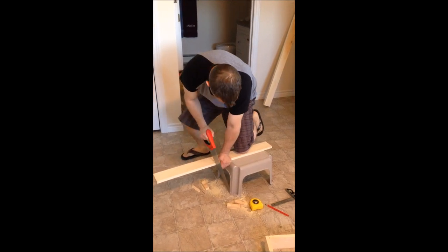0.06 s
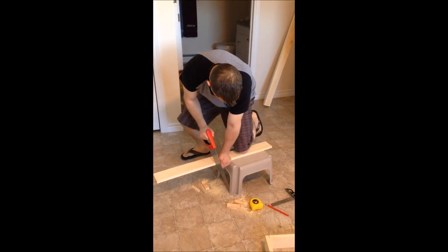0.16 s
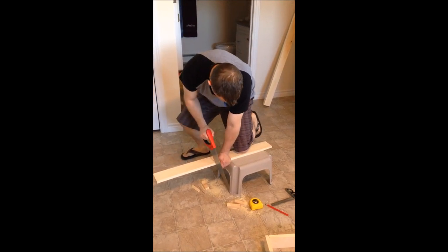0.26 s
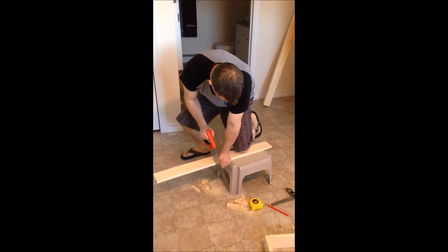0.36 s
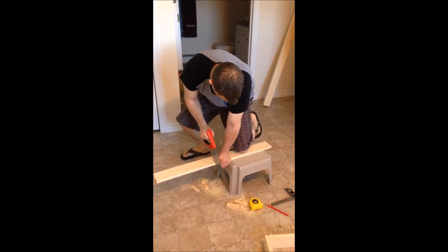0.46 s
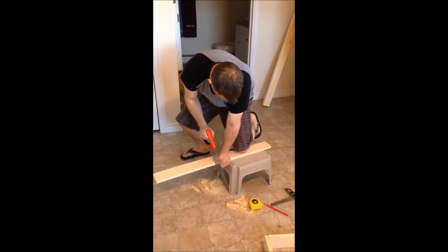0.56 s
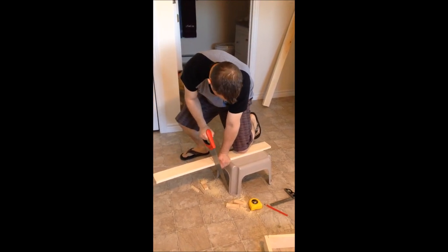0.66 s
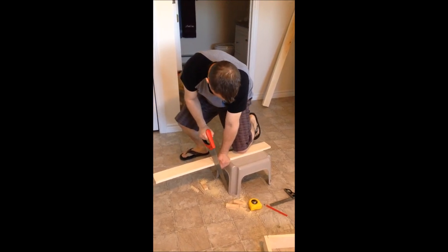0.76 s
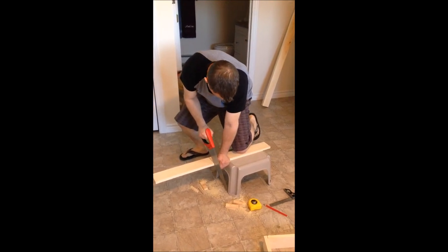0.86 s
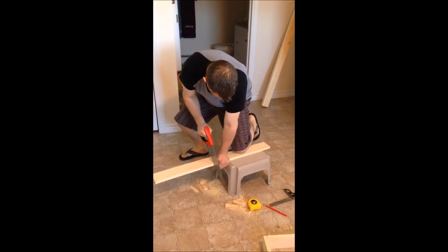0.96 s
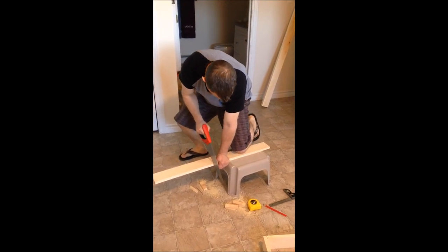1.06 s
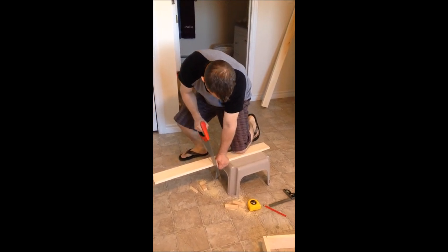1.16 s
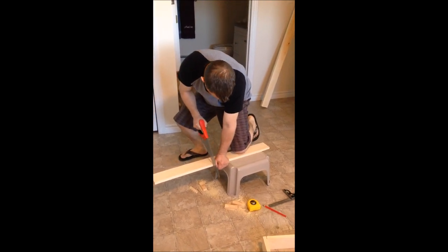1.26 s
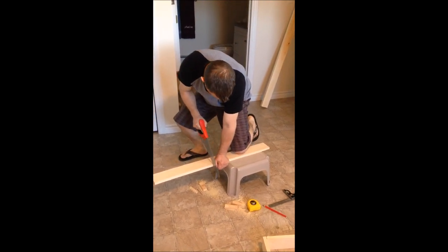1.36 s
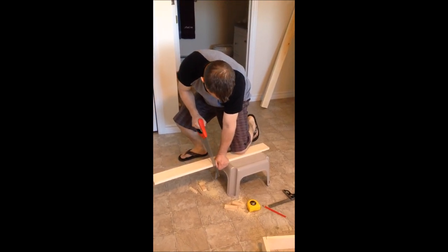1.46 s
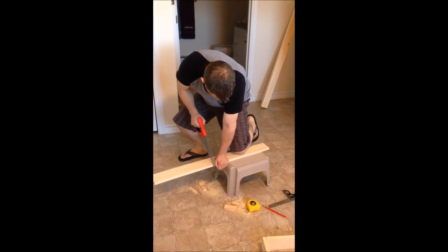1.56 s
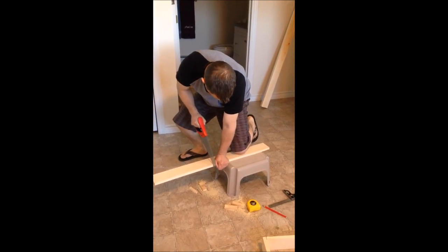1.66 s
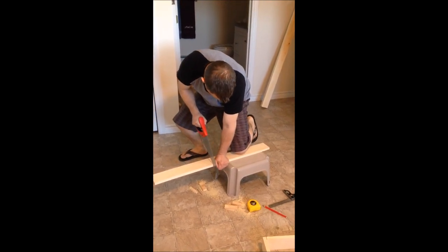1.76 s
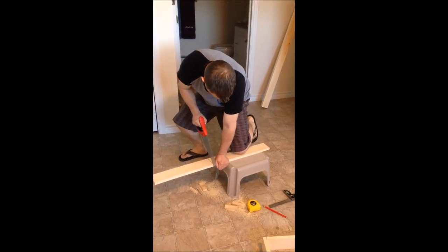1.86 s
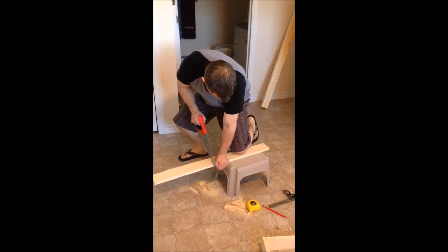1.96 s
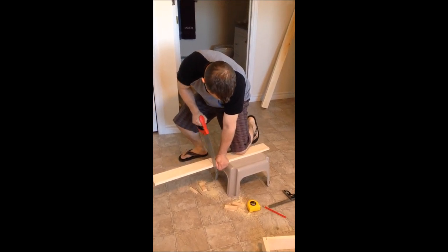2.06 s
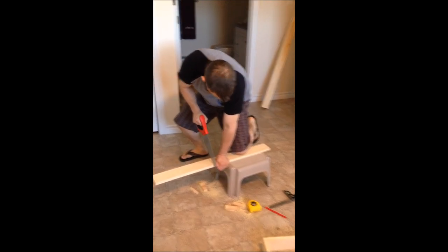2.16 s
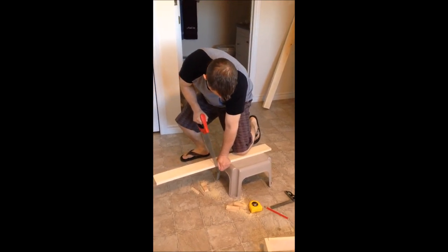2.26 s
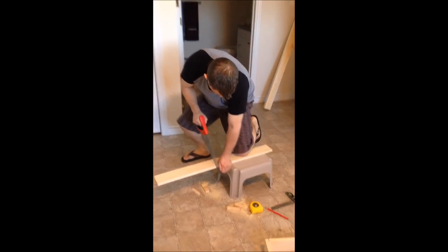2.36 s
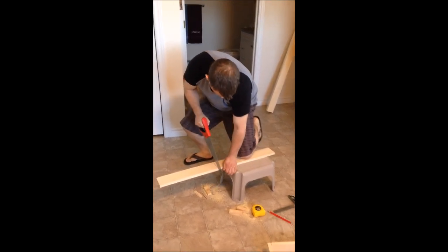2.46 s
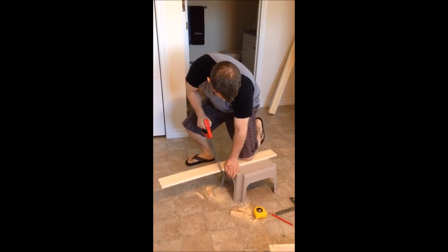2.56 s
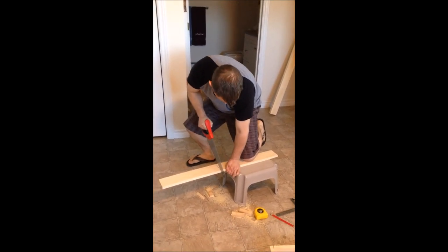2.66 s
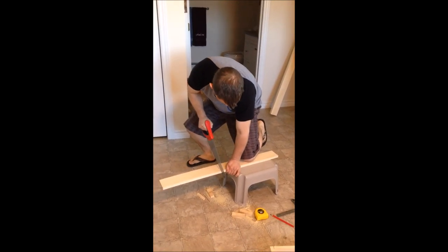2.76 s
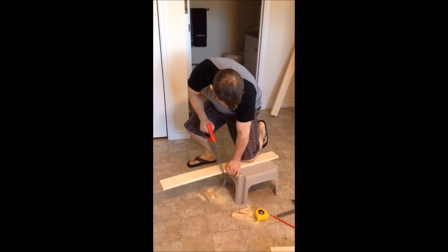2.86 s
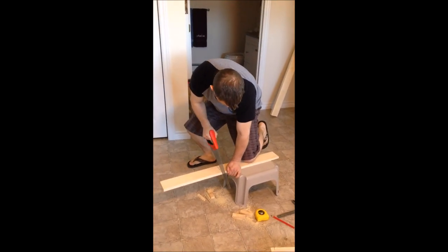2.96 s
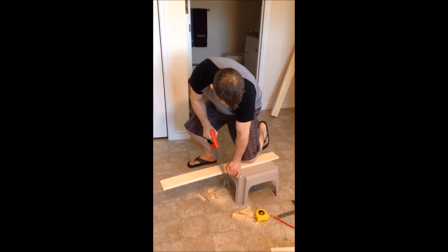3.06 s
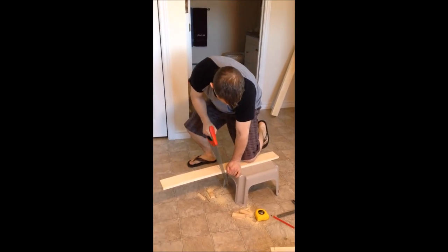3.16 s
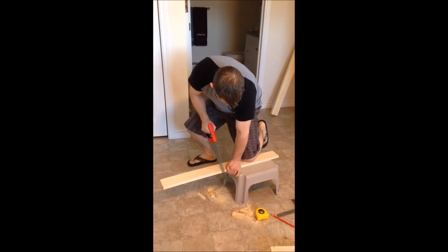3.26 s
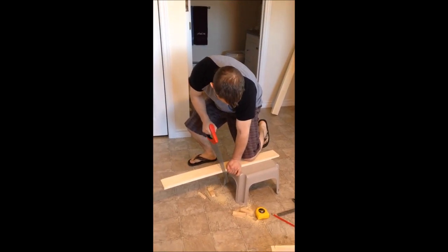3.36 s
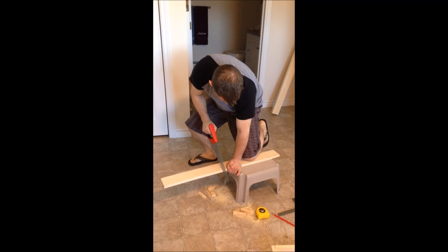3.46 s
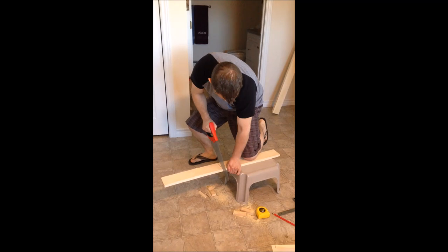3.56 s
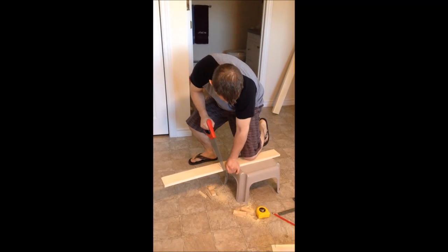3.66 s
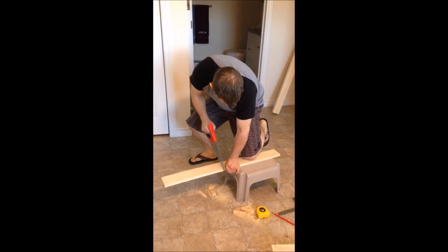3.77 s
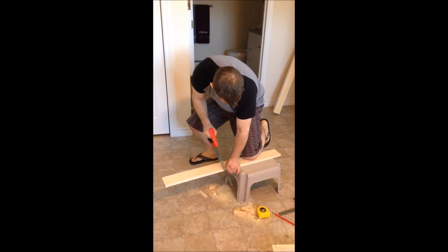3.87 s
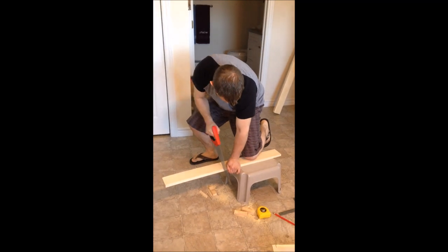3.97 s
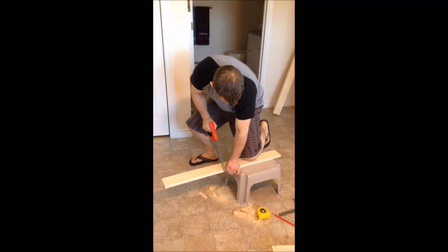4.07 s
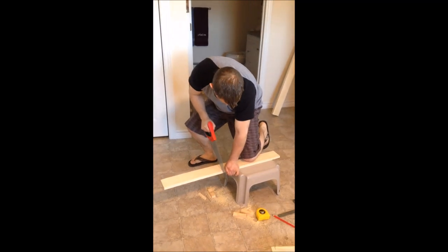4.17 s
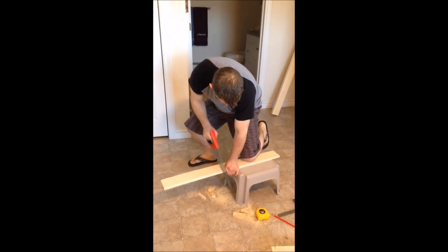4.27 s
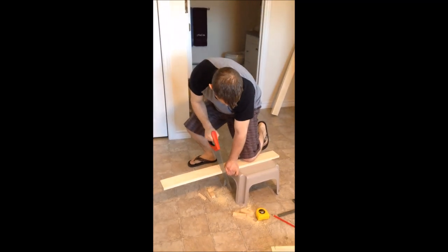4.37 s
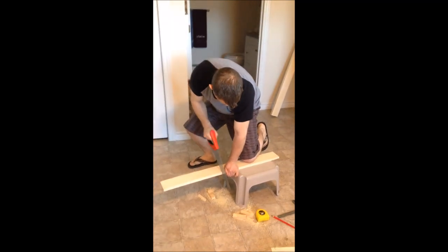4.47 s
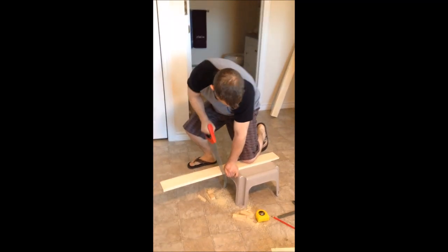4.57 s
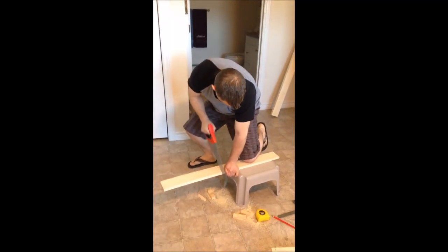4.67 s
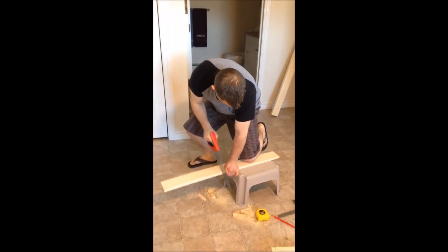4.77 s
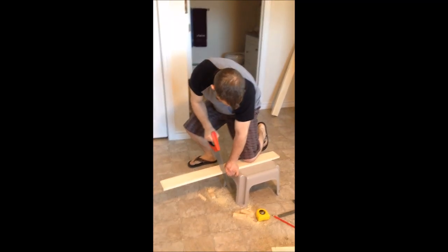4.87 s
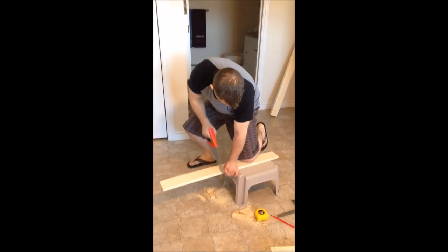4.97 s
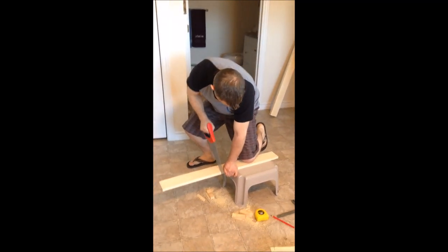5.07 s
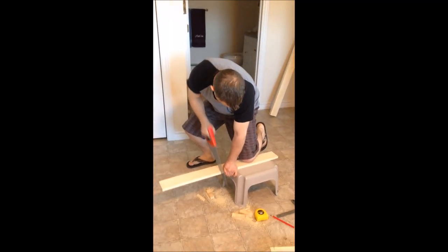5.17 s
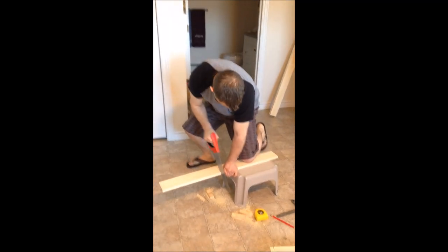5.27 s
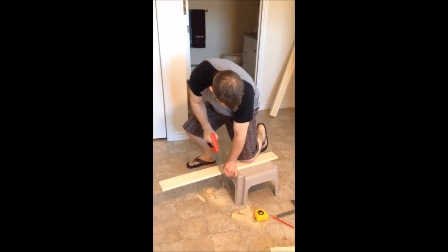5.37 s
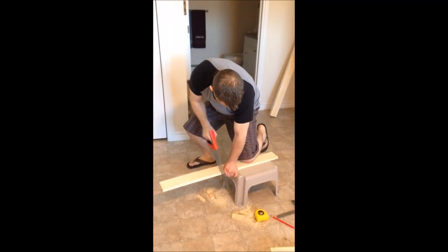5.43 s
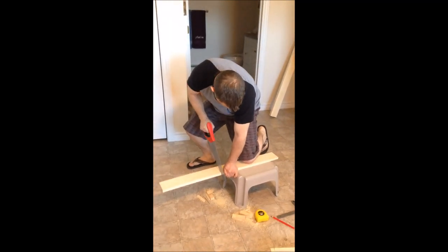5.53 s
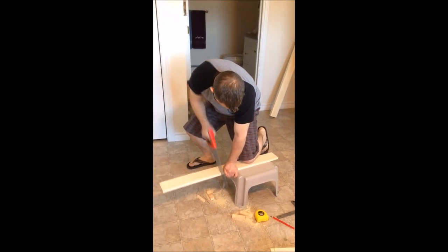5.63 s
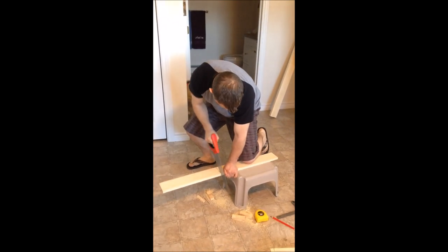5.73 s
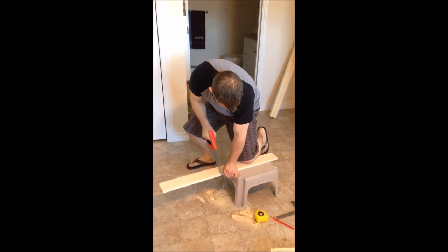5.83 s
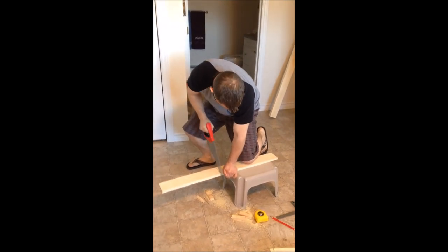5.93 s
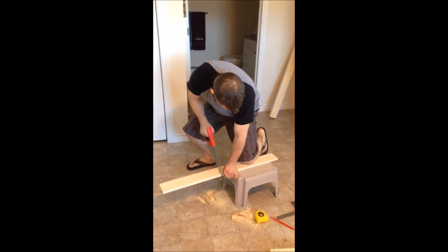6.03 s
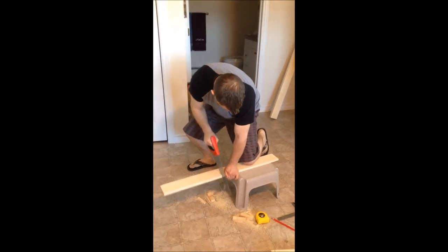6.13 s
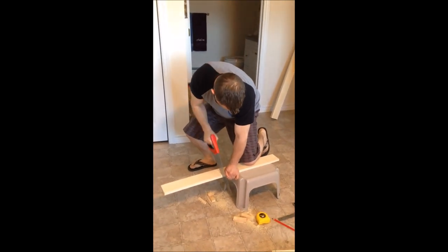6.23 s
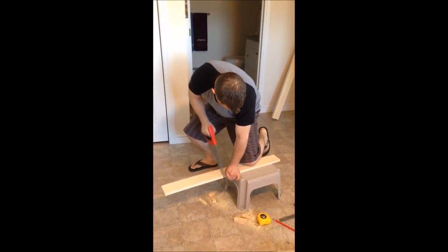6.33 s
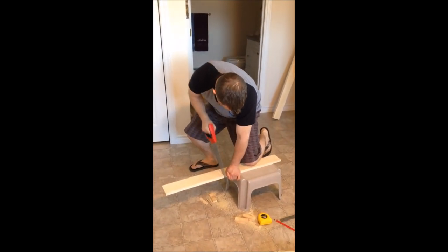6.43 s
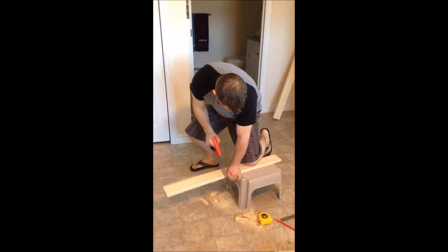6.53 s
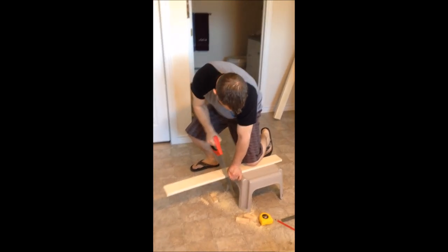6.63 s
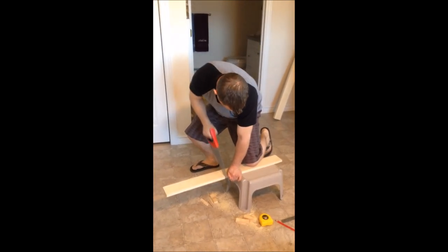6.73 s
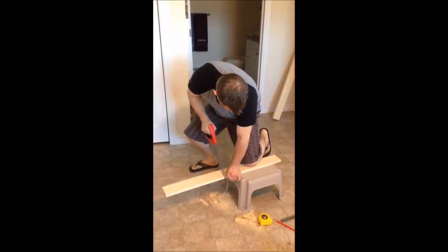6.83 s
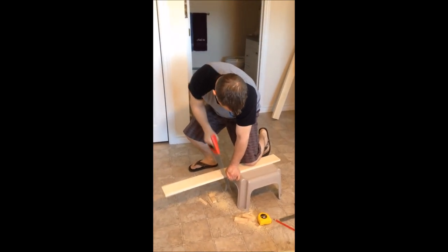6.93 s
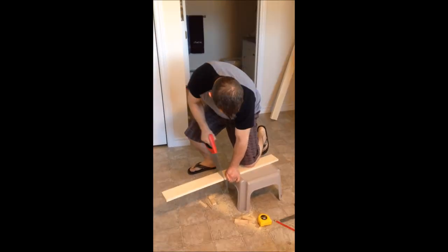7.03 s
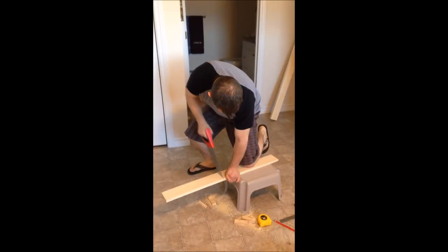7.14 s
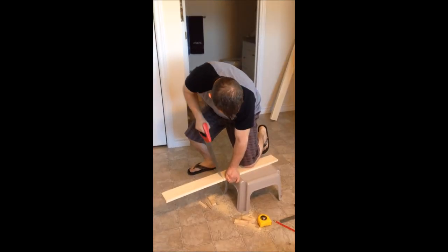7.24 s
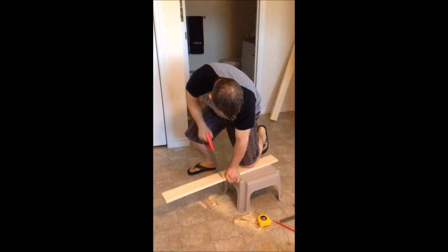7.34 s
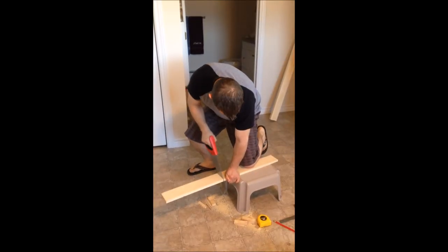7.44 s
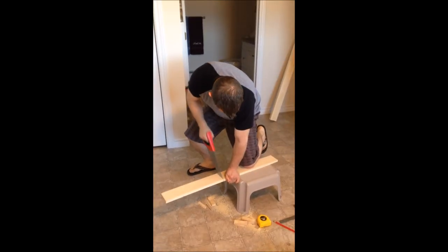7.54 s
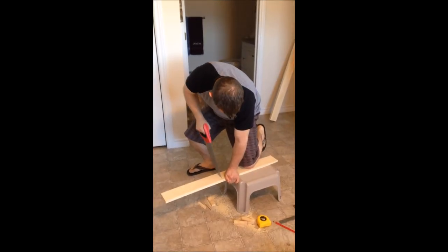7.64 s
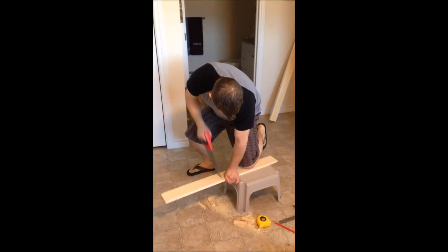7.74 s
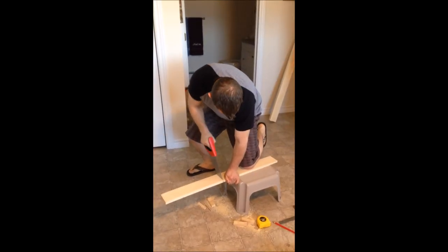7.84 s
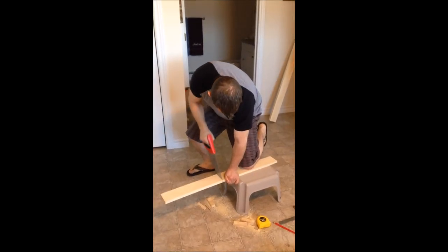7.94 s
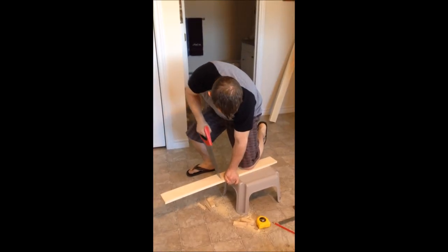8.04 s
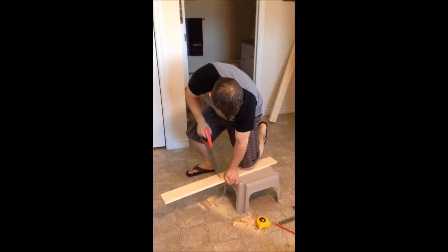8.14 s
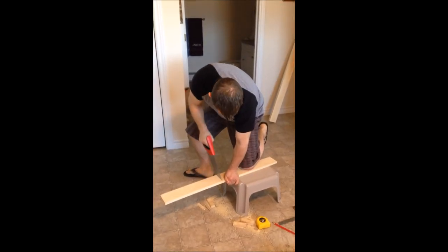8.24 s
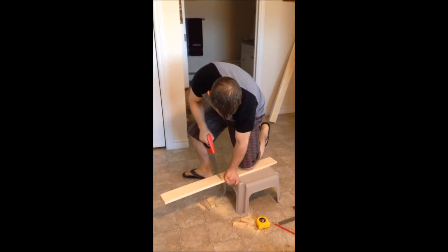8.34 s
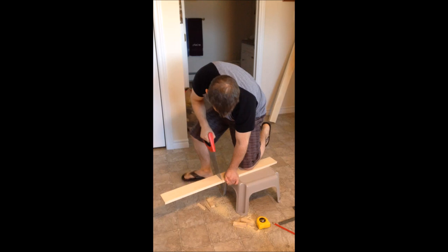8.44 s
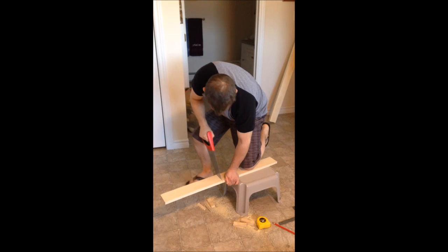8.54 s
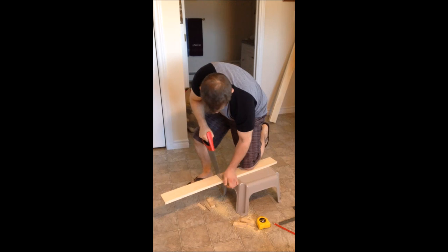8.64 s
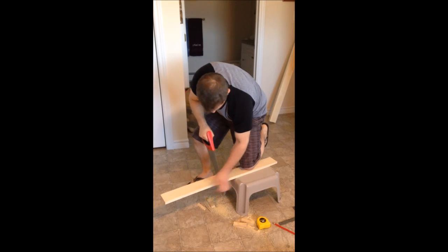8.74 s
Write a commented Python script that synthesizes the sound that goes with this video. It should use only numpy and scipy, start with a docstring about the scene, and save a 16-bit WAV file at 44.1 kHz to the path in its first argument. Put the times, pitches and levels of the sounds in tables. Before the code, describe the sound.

Handheld microphone a short distance from a hand saw indoors. After near silence and small ticks, a slow first stroke squeaks slightly, then pauses into faint scrapes. Regular gritty strokes begin around three seconds, each swelling and fading, with hollow wooden resonance, occasional sharp snags and dull stool thumps. The pitch of the wood falls late, and sawing stops before the end.

```python
"""Faint room air and a wavering appliance hum, then teeth ticking into wood: a hand saw starts across a pine board.
The board is held down on a plastic stool in a small hard-floored room. One long draw and a few light scratches
start the kerf; then come hard pushes with light returns, a little over two a second. Each stroke swells and fades
in one arch: one tooth force tears fibres, sings in the blade and rings the board, lower once it is nearly through.
Now and then a tooth snags, the board knocks on the stool or the stool thumps the floor."""
import sys
import numpy as np
from scipy import signal
from scipy.fft import rfft, irfft
from scipy.io import wavfile
from scipy.ndimage import uniform_filter1d

SR = 44100
rng = np.random.default_rng(int(sys.argv[2]) if len(sys.argv) > 2 else 0)


def output_pcm(signal):
    """Save a mono or channel-first signal as 16-bit PCM at the path in sys.argv[1].

    Samples are clipped to [-1, 1] before scaling.
    """
    pcm = np.clip(np.atleast_2d(signal).T, -1, 1) * 32767
    wavfile.write(sys.argv[1], SR, np.round(pcm).astype(np.int16))


N = 388080
TIME = np.arange(N) / SR

# cutting strokes, the long first draw and then the pushes; levels are relative, before the mix trims:
# (start_s, length_s, fastest_share of length, rasp_db, grip_db on the wood over the rasp,
#  shakiest_share of length, shudder_db)
CUTTING = [(0.985, 0.49, 0.4, -41, 2.5, 0.76, -21), (2.976, 0.22, 0.29, -35, 5.5, 0.46, -24.5),
           (3.471, 0.057, 0.36, -41.5, 10.5, 0.35, -31), (3.87, 0.18, 0.45, -31, 5.0, 0.52, -17.0),
           (4.337, 0.22, 0.42, -33, 8, 0.63, -17), (4.815, 0.2, 0.39, -32.5, 5.5, 0.5, -17.5),
           (5.269, 0.16, 0.59, -31.0, 8, 0.54, -21), (5.712, 0.17, 0.55, -30.5, 8.5, 0.38, -17.5),
           (6.144, 0.18, 0.63, -31.5, 8.5, 0.65, -18), (6.584, 0.16, 0.582, -30.0, 7.5, 0.52, -19.0),
           (6.999, 0.15, 0.59, -30, 6, 0.8, -19.5), (7.394, 0.17, 0.67, -31.5, 11.5, 0.63, -17),
           (7.858, 0.16, 0.59, -30, 10.5, 0.22, -17.5), (8.281, 0.17, 0.45, -29.5, 10.0, 0.43, -18)]
# light strokes, scratches and returns, where the teeth only skim; the same columns
SKIMMING = [(1.588, 0.24, 0.25, -56.5, 7.5, 0.25, -38.5), (2.001, 0.14, 0.34, -51, -0.5, 0.18, -39.5),
            (2.139, 0.087, 0.41, -56.0, 4, 0.42, -50.5), (2.312, 0.223, 0.11, -67.5, 9, 0.34, -43),
            (3.217, 0.32, 0.23, -53, 7.5, 0.23, -29.5), (3.688, 0.18, 0.47, -51.5, 6.5, 0.54, -29.5),
            (4.123, 0.19, 0.68, -45, 4.5, 0.52, -28.5), (4.62, 0.18, 0.52, -47, 8.5, 0.68, -30),
            (5.073, 0.18, 0.73, -46.0, 6.5, 0.78, -27.5), (5.483, 0.21, 0.74, -44.0, 4, 0.75, -29),
            (5.91, 0.22, 0.72, -43.0, 4.5, 0.88, -31.5), (6.29, 0.28, 0.75, -42.5, 6.5, 0.61, -32),
            (6.731, 0.242, 0.637, -42.5, 8.5, 0.5, -34), (7.123, 0.3, 0.69, -50.5, 12, 0.67, -33.5),
            (7.549, 0.31, 0.62, -49.5, 12, 0.37, -34.5), (8.0, 0.32, 0.57, -47, 8, 0.72, -35.5),
            (8.474, 0.15, 0.3, -46.5, -10, 0.56, -44.5), (8.612, 0.21, 0.29, -56, 5.5, 0.49, -55)]


def from_db(db):
    """Decibels to gain."""
    return np.exp(np.asarray(db) * np.log(10) / 20)


def rms_one(x):
    """Scale to an rms of one."""
    return x / np.sqrt(np.mean(x ** 2) + 1e-20)


def in_time(rows):
    """A curve from rows (time_s, value), read at every sample."""
    return np.interp(TIME, *np.transpose(rows))


def at_hz(points, hz):
    """Read a table of (pitch_hz, value) on a log-frequency axis."""
    table = np.array(points)
    return np.interp(np.log(np.maximum(hz, 1)), np.log(table[:, 0]), table[:, 1])


def drift(rate):
    """Smooth chance with a spread of about one that changes rate times a second."""
    knots = rng.standard_normal(N // 64)
    return np.interp(TIME * rate, np.arange(len(knots)), knots)


def band(x, low_hz, high_hz):
    """Band-pass with gentle slopes."""
    edges_hz = [low_hz, min(high_hz, 0.45 * SR)]
    return signal.sosfilt(signal.butter(2, edges_hz, "band", fs=SR, output="sos"), x)


def coloured(x, spectrum):
    """Give a steady sound a spectrum; rms one."""
    hz = np.arange(N // 2 + 1) * SR / N
    return rms_one(irfft(rfft(x) * from_db(at_hz(spectrum, hz)), N))


def resonate(x, modes, shift_db=0):
    """Parallel resonances of alternating sign; their strengths shift as the contact point moves."""
    out = np.zeros(N)
    for k, (hz, width_hz, level_db) in enumerate(modes):
        radius = np.exp(-np.pi * width_hz / SR)
        poles = [1, -2 * radius * np.cos(2 * np.pi * hz / SR), radius ** 2]
        zeros = [(1 - radius ** 2) / 2, 0, (radius ** 2 - 1) / 2]
        ringing = signal.lfilter(zeros, poles, x + 1e-18)
        out += (-1) ** k * from_db(level_db + shift_db * drift(9)) * ringing
    return out


def jolts(events):
    """Sudden forces that die away exponentially, from rows (start_s, level_db, decay_s)."""
    out = np.zeros(N)
    for start_s, level_db, decay_s in events:
        start = int(start_s * SR)
        t = TIME[:min(SR // 5, N - start)]
        out[start:start + len(t)] += from_db(level_db) * np.exp(-t / max(decay_s, 1e-3))
    return out


def patchy(x, patch_db, per_s=26):
    """The grain of the wood shifts band levels by patch_db, while the top's crispness shifts by stroke."""
    # crispness of the tearing, shifting from stroke to stroke and dullest at the end:
    # (time_s, level_db on the top octave)
    crispness = [(1.0, -4), (2.3, -5), (4.0, -5), (5.3, -3.5), (6.2, -5), (7.1, -3.5), (7.9, -5),
                 (8.4, -7.5)]
    hz = np.arange(N // 2 + 1) * SR / N
    centres_hz = np.geomspace(700, 14000, 13)
    spectrum, crisp_db, out = rfft(x), in_time(crispness), 0
    for centre_hz, shape in zip(centres_hz, np.eye(len(centres_hz))):
        weight = np.interp(hz, centres_hz, shape)   # overlapping triangles
        top = np.clip(np.log2(centre_hz / 7000), 0, 1)
        out = out + irfft(spectrum * weight, N) * from_db(patch_db * drift(per_s) + top * crisp_db)
    return rms_one(out)


def background(air_trim_db=-2.0, waver_db=-4.5, wander_rad=1.0):
    """Faint shaped-noise room air under appliance hum tones that waver in level and phase."""
    # still air of the room: (pitch_hz, level_db per Hz, relative)
    air_spectrum = [(15, -66), (25, -28), (43, -15), (121, -7.5), (158, -11), (237, -14), (318, -13.5),
                    (604, -18), (1240, -31.5), (1540, -30), (1670, -34), (2020, -34), (2560, -36),
                    (15000, -50.5)]
    # hum of a household appliance: (pitch_hz, level_db before the waver)
    hum_tones = [(86, -106), (117.5, -55.5), (233, -62), (592, -72), (1997, -80.5)]
    air = from_db(-51.5 + air_trim_db) * coloured(rng.standard_normal(N), air_spectrum)
    hum = 0
    for hz, level_db in hum_tones:
        gain = from_db(level_db + waver_db * drift(7.2))
        hum = hum + gain * np.sin(2 * np.pi * hz * TIME + wander_rad * drift(4.18))
    return air + np.sqrt(2) * hum


def rips():
    """The teeth set into the wood or rip out a splinter: the bite leaps up and dies away."""
    # (start_s, level_db before the mix trim, decay_s)
    rip_events = [(0.6729, -46, 0.007), (0.7392, -37.5, 0.01), (0.818, -52, 0.009), (0.8649, -48.5, 0.009),
                  (0.974, -39.5, 0.009), (0.9842, -28.5, 0.023), (2.4285, -45, 0.016), (2.553, -47, 0.007),
                  (2.8843, -52, 0.0073), (2.973, -37, 0.011), (3.475, -37, 0.0061), (3.489, -30, 0.0027),
                  (3.6825, -48, 0.0098), (3.8824, -25, 0.0072), (4.3405, -26, 0.0096), (6.1466, -36, 0.019),
                  (7.102, -14.5, 0.0033), (7.856, -37, 0.015), (7.878, -20.5, 0.018),
                  (8.7565, -36.5, 0.014)]
    return jolts(rip_events)


def arch(start_s, length_s, peak_share, shape):
    """Gain over one stroke: the arm speeds up to a peak, then slows to the turn."""
    # outside a stroke: how fast the contact builds before it and lets go after it
    engage_s, let_go_s = 0.01965, 0.119
    ends_db, rise, fall = shape
    coarse_time = TIME[::32]
    along = (coarse_time - start_s) / length_s
    top = np.clip(peak_share, 0.05, 0.95)
    rising_sag = np.abs(1 - along / top) ** rise
    falling_sag = np.abs((along - top) / (1 - top)) ** fall
    sag = np.where(along < top, rising_sag, falling_sag)
    before, after = np.maximum(-along, 0), np.maximum(along - 1, 0)
    outside = length_s * (before / engage_s + after / let_go_s)
    return np.interp(TIME, coarse_time, from_db(-ends_db * sag) * np.exp(-outside) + 1e-9)


def strokes():
    """The arm's work, cut by cut and skim by skim: strength of the bite, and of the board's shudder."""
    # arches: (dB down at both ends, bluntness of the rise, bluntness of the fall), rasp then shudder
    cut_shapes = (21.5, 3.6, 1.2), (15.4, 2.96, 0.97)
    skim_shapes = (15.0, 1.8, 1), (19.4, 0.86, 2.3)
    resting_db = -76   # the teeth lying in the kerf between strokes
    bite = from_db(resting_db) * (TIME > CUTTING[0][0]) + 1e-6
    shake_power = 0
    for rows, (rasp_shape, shudder_shape) in ((CUTTING, cut_shapes), (SKIMMING, skim_shapes)):
        for start_s, length_s, fastest, rasp_db, _, shakiest, shudder_db in rows:
            bite = bite + from_db(rasp_db) * arch(start_s, length_s, fastest, rasp_shape)
            shake = from_db(shudder_db) * arch(start_s, length_s, shakiest, shudder_shape)
            shake_power = shake_power + shake ** 2
    return bite, np.sqrt(shake_power)


def tooth_force(bite_db):
    """Fibres snap under passing teeth, slightly bunched by each tooth; a harder stroke is also a faster one."""
    teeth_per_s, jitter, pulsing = 420, 0.34, 0.051   # the rate is that of the hardest bite, before jitter
    fibres_per_s, size_db, catch_db = 4000, 2.5, 2.0
    speed = from_db((bite_db - bite_db.max()) * 0.34)
    teeth = np.cumsum(teeth_per_s * speed * (1 + jitter * drift(300))) / SR
    pressure = np.exp(pulsing * np.cos(2 * np.pi * teeth)) * from_db(catch_db * drift(110))
    sizes = from_db(size_db * np.minimum(rng.exponential(1, N), 4)) * rng.choice([-1, 1], N)
    snaps = sizes * (rng.random(N) < fibres_per_s / SR)
    rubbing = 0.69 * rng.standard_normal(N)
    return rms_one(pressure * (rms_one(snaps) + rubbing))


def tearing_fibres(force):
    """The rasp: the tooth force in the colour of tearing fibres, patchy with the grain; rms one."""
    # (pitch_hz, level_db per Hz, relative)
    rasp_spectrum = [(35, -1.5), (90, 10.5), (160, 12.5), (400, 8), (750, 2), (1300, -13), (2300, 6),
                     (3500, 2), (5000, 2), (7500, 0), (10000, -0.5), (13000, 2), (15500, -0.5)]
    return patchy(coloured(force, rasp_spectrum), patch_db=3.0)


def blade(force):
    """The tooth force rings the steel blade, which sings more where the kerf leaves it free."""
    # ring of the steel, damped in the kerf: (pitch_hz, width_hz, level_db)
    blade_modes = [(1897, 130, 0.5), (2460, 110, -12), (5920, 630, -16.5), (6530, 97, -12),
                   (10030, 340, -17.5)]
    # how freely it sings, loosest in the shallow kerf: (time_s, level_db against the rasp before its trim)
    freedom = [(1.0, -4), (1.28, -6.5), (1.37, 11), (1.6, -7.5), (2.4, -2), (3.05, -9), (4.0, -4),
               (4.7, -3), (5.35, -4.5), (6.0, -2), (6.25, -5), (6.9, -2), (7.1, -2.5), (8.6, -14.5)]
    return from_db(in_time(freedom)) * rms_one(resonate(force, blade_modes, shift_db=1.5))


def board(force, whole, severed, shift_db):
    """The board's ring passes from one set of modes to the other as the kerf weakens it."""
    # the board weakens at the cut: (time_s, share of the nearly severed ring 0-1)
    weakening = [(6.3, 0), (6.95, 0.03), (7.15, 0.92), (7.4, 1)]
    share = np.clip(in_time(weakening), 0, 1)
    before = rms_one(resonate(force, whole, shift_db))
    after = rms_one(resonate(force, severed, shift_db))
    return np.sqrt(1 - share) * before + np.sqrt(share) * after


def timber(force, dense_db=-4.5):
    """The board's voice: a few clear modes over a bed of overlapping ones; rms one."""
    # higher modes of the wood, whole and nearly severed: (pitch_hz, width_hz, level_db)
    whole_modes = [(436, 8.4, -7), (541.5, 37, 4.5), (633, 82, 1.5), (803, 12, 8.5), (888, 80, 2.5),
                   (998, 91, 5.5), (1170, 240, -17), (1410, 85, -10), (1652, 122, 0), (1722, 128, 3),
                   (2147, 36, -4), (2646, 166, 1)]
    severed_modes = [(330, 36, 4), (413, 53, 15), (623, 55, 10.5), (776, 19, 10.5), (969, 48, 5.5),
                     (1130, 88, 6.5), (1226, 270, 4), (1440, 250, 1.5), (1690, 300, -16), (2260, 47, -19),
                     (2740, 370, -29), (3475, 83, -21)]
    # the wood's countless overlapping modes: (pitch_hz, level_db per Hz, relative)
    dense_spectrum = [(200, -30), (380, -6.5), (600, -1), (1000, 0.5), (1500, 4), (2300, -1.5),
                      (3200, -2.5), (4500, -9), (7000, -18), (15000, -41)]
    clear = board(force, whole_modes, severed_modes, shift_db=3.0)
    scattered = force * rng.choice([-1, 1], N)   # random signs for the crowded modes
    dense = patchy(coloured(scattered, dense_spectrum), patch_db=0.0)   # crispness only
    return rms_one(clear + from_db(dense_db) * dense)


def grip():
    """How well the teeth drive the wood, in dB, passing from each stroke's value to the next."""
    points = []
    for start_s, length_s, fastest, _, grip_db, _, _ in [*CUTTING, *SKIMMING]:
        points.append((start_s + length_s * fastest, grip_db))
    return in_time(sorted(points))


def shudder(force, strength, hold_s=0.0239):
    """The bending modes throb; the holding hand keeps their swing in bounds."""
    # bending modes of board and stool, whole and nearly severed: (pitch_hz, width_hz, level_db)
    whole_bends = [(199.4, 24, -11.5), (251.8, 34, 0), (284.1, 27.4, -3.5), (322.6, 22, -13)]
    severed_bends = [(144, 49, -12), (209.2, 30.3, 2.5), (224.4, 43, -7.5)]
    # bending modes of the board's free end: (pitch_hz, width_hz, level_db)
    end_bends = [(158, 9.6, -4), (182.8, 10.6, -1)]
    # the free end flaps, strongest at the first draw and again at the last strokes:
    # (time_s, level_db over the other bends)
    flapping = [(1.2, -5.5), (2.3, -12), (3.1, -7), (4.5, -6), (5.4, -9), (6.7, -11.5), (7.5, -12.5),
                (8.4, -5.5)]
    free_end = from_db(in_time(flapping)) * rms_one(resonate(force, end_bends))
    bending = board(force, whole_bends, severed_bends, shift_db=2.5)
    swing = band(bending - free_end, 117, 492)
    size = np.sqrt(uniform_filter1d(swing ** 2, int(hold_s * SR)) + 1e-9)
    return band(swing / size * strength, 125, 1000)


def knocks():
    """The board knocks on the stool, and at the start of the first draw it swings as the teeth set in: its
    swing swells within a few cycles and dies away."""
    # (start_s, level_db before the mix trim)
    knock_events = [(1.005, -21.5), (1.055, -26.5), (1.628, -30.5), (2.327, -33), (2.999, -12.5),
                    (3.483, -17), (4.4, -12), (4.904, -12), (5.327, -15), (6.189, -15.5), (6.641, -17),
                    (6.906, -28.5), (7.417, -9), (7.65, -30), (7.957, -16.5), (8.294, -12)]
    swell_s = 0.017
    out = np.zeros(N)
    for start_s, level_db in knock_events:
        start = int(start_s * SR)
        age = TIME[:min(SR // 4, N - start)] / swell_s
        out[start:start + len(age)] += from_db(level_db) * age * np.exp(1 - age)
    return out


def snags():
    """A caught tooth lets go with a crack of a few milliseconds that pings the blade."""
    # (start_s, level_db of the driving noise, decay_s)
    snag_events = [(1.1004, -19, 0.0084), (3.0887, -9, 0.0042), (6.2533, -5, 0.0045),
                   (7.9637, -11.5, 0.0046), (8.3694, -17, 0.0045)]
    # the ping in the blade: (pitch_hz, width_hz, level_db)
    crack_modes = [(2340, 510, 6), (5970, 1300, -4.5), (10500, 5000, -12)]
    return resonate(jolts(snag_events) * rng.standard_normal(N), crack_modes)


def binding():
    """The blade binds and the bite drops, wholly or in part: the share lost, 0-1, which then recovers."""
    # (start_s, level_db of the lost share, held at a full loss above 0, recovery_s)
    bind_events = [(1.372, -3, 0.14), (6.282, 6, 0.011), (7.116, 6, 0.034), (7.988, -10, .03)]
    return np.clip(jolts(bind_events), 0, 1)


def thumps():
    """A hard push rocks the stool on the floor: its feet load it with a dull boom."""
    # (start_s, level_db of the driving noise, decay_s)
    thump_events = [(5.825, -12, 0.02), (7.095, -14, 0.023), (8.31, -10, 0.022), (8.365, -13, 0.018)]
    # the stool's boom: (pitch_hz, width_hz, level_db)
    stool_modes = [(80, 28, 1.5)]
    return band(resonate(jolts(thump_events) * rng.standard_normal(N), stool_modes), 45, 130)


def room(x, build_s=0.0008):
    """Dense reflections that build up quickly and then die at a rate of their own in each band."""
    # the room's ring: (pitch_hz, t60_s)
    ring_times = [(150, 0.4), (600, 0.43), (2000, 0.32), (5000, 0.4), (12000, 0.082)]
    t = TIME[:SR * 3 // 4]
    edges_hz = np.geomspace(60, 18000, 11)
    tail = 0
    for low_hz, high_hz in zip(edges_hz, edges_hz[1:]):
        fade = 1000 ** (-t / at_hz(ring_times, np.sqrt(low_hz * high_hz)))   # down 60 dB at t60
        tail = tail + band(rng.standard_normal(len(t)), low_hz, high_hz) * fade
    tail = tail * (1 - np.exp(-t / build_s))
    return signal.fftconvolve(x, tail / np.sqrt(np.sum(tail ** 2)))[:N]


def moving_room(x):
    """The saw and the kneeling body move, so the sound keeps passing between two reflection patterns."""
    turn = 2 * np.pi * 0.9 * TIME + drift(3)
    return room(x * np.cos(turn)) + room(x * np.sin(turn))


def scene():
    """One tooth force sounds the fibres, blade and board; the room answers all but the stool's thumps."""
    effort, shake = strokes()
    bite_db = 20 * np.log10(effort)
    force = tooth_force(bite_db)
    bite = (effort + from_db(-13) * rips()) * (1 - binding())

    steel = bite * (from_db(3.5) * tearing_fibres(force) + blade(force))
    pings = from_db(-0.5) * snags()

    pressed_db = 0.098 * (bite_db - bite_db.max())   # light strokes only skim and drive the wood less
    wood = bite * from_db(grip() + pressed_db - 4) * timber(force)
    swing_strength = np.hypot(from_db(-2) * shake, from_db(-3) * knocks())
    thrum = shudder(force, swing_strength)

    sends = from_db(-12) * steel + from_db(-11.5) * pings
    sends = sends + from_db(-2) * wood + from_db(-13.5) * thrum
    direct = steel + pings + wood + thrum + from_db(7.5) * thumps()
    return (direct + moving_room(sends) + background())[None]


def record(dry):
    """The top is cut steeply above a cutoff in Hz."""
    cutoff_hz = 15450
    return signal.sosfilt(signal.ellip(12, 0.1, 90, cutoff_hz, fs=SR, output="sos"), dry)


dry = scene()
out = record(dry)
output_pcm(out)
```